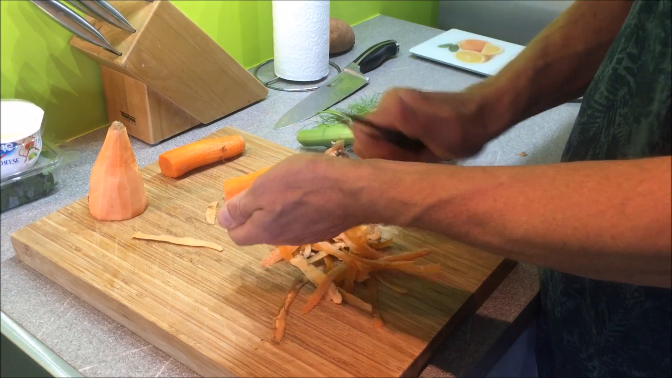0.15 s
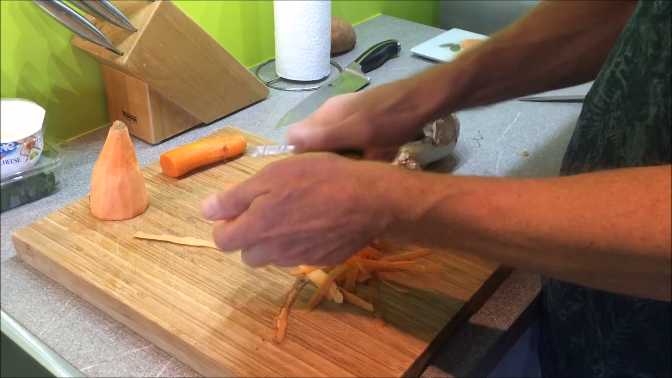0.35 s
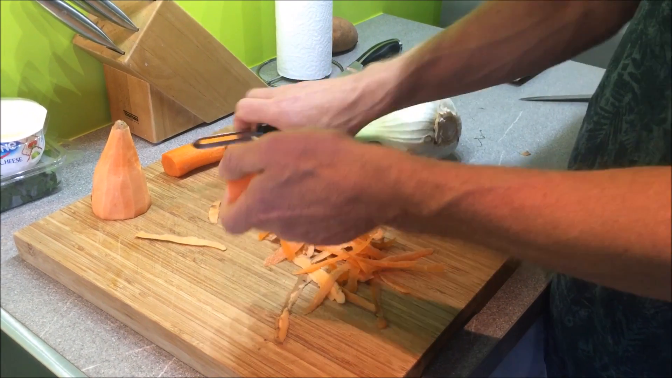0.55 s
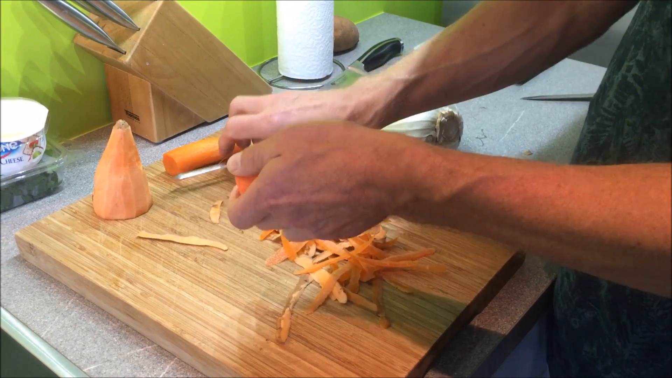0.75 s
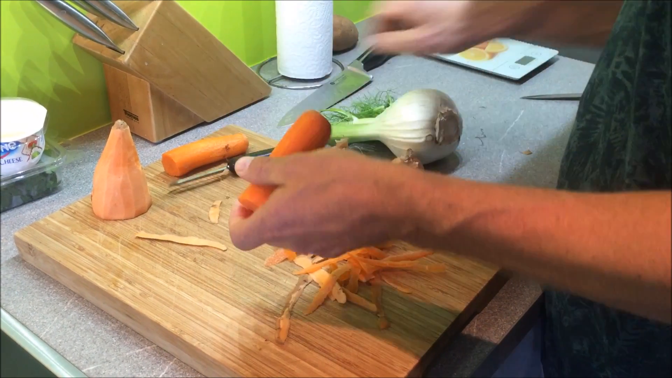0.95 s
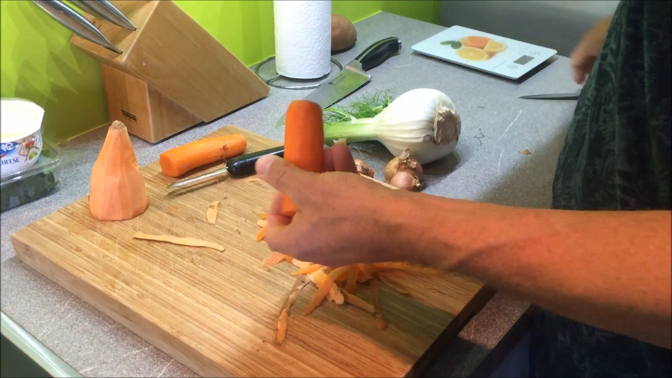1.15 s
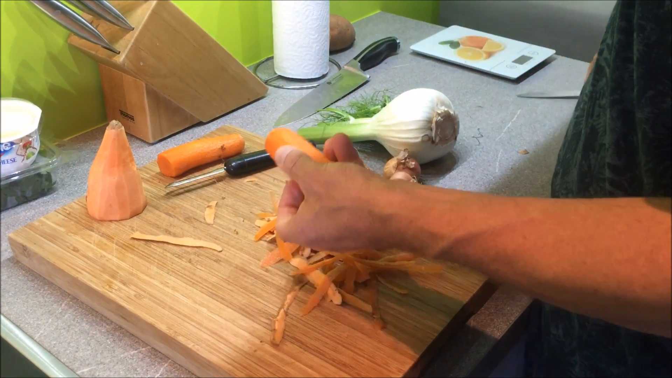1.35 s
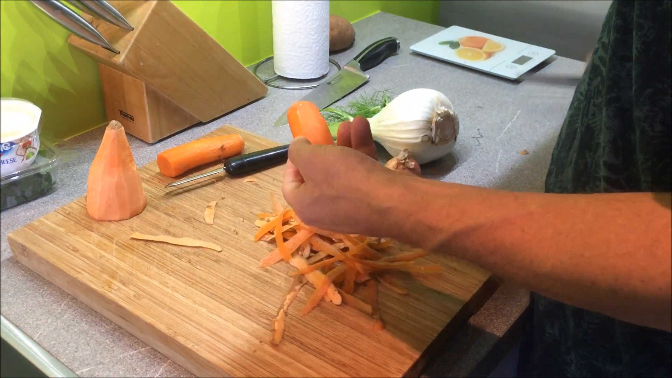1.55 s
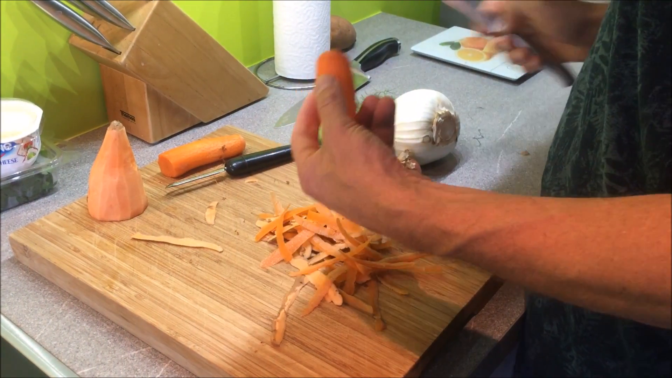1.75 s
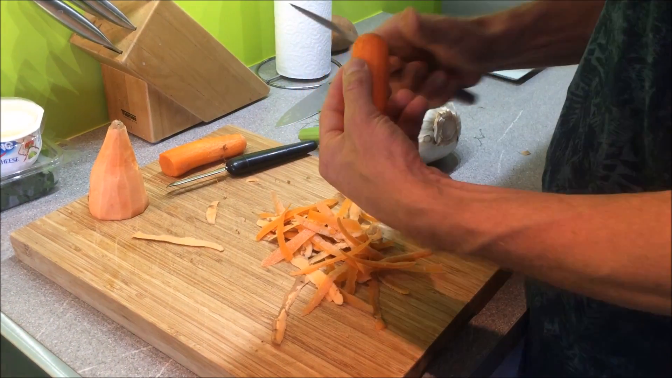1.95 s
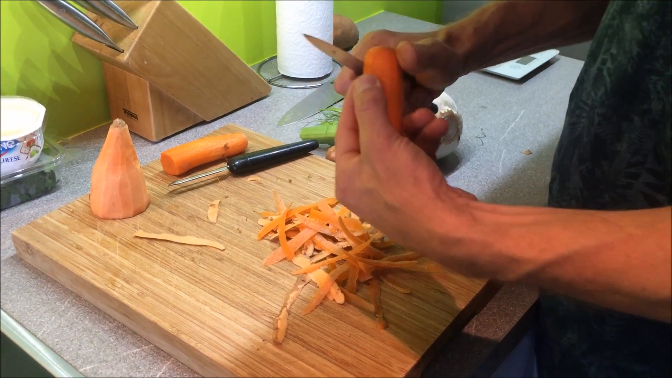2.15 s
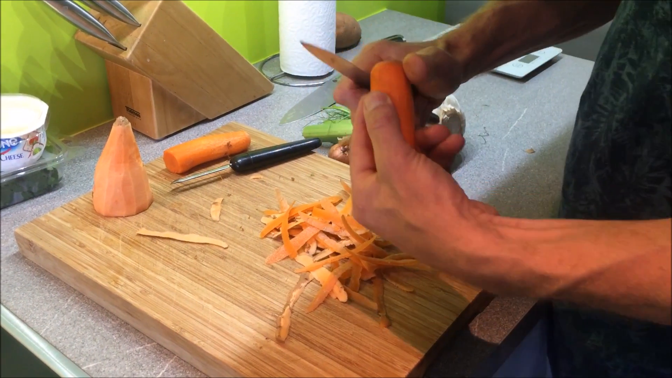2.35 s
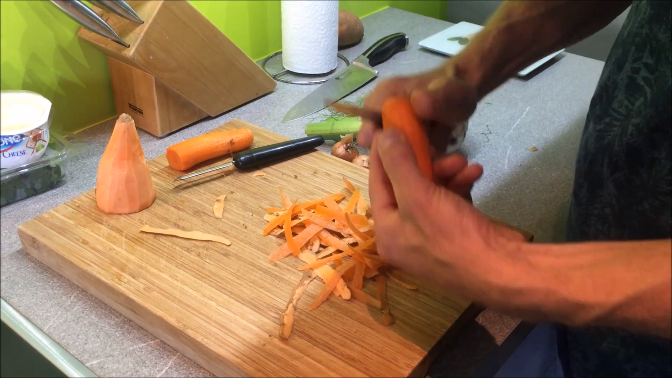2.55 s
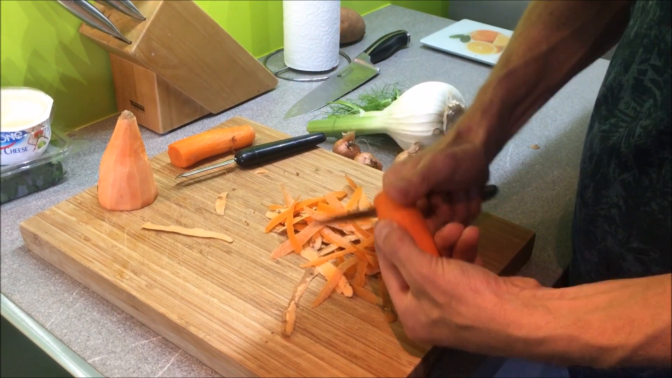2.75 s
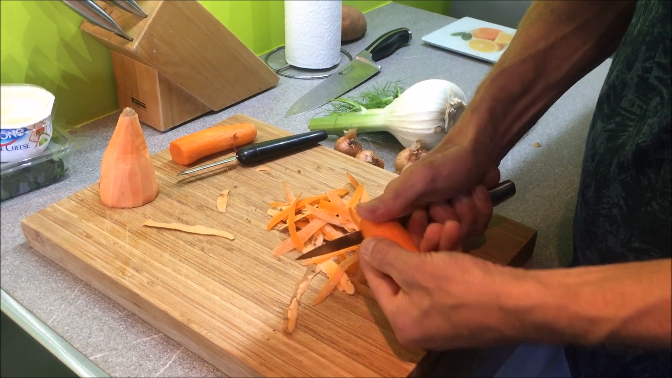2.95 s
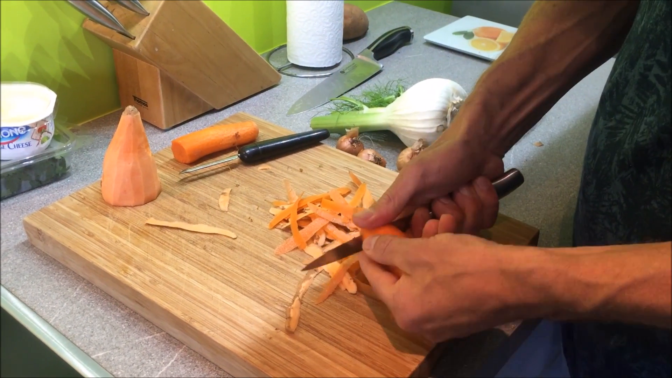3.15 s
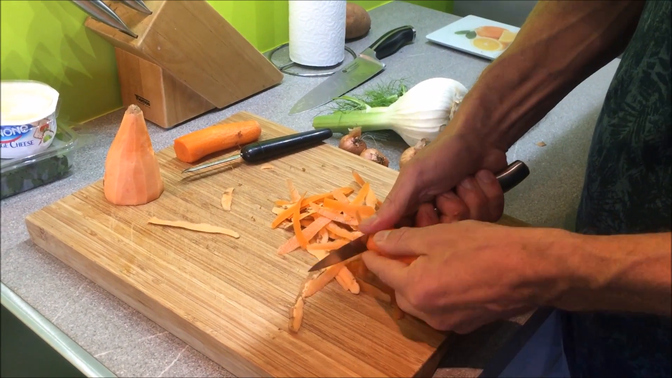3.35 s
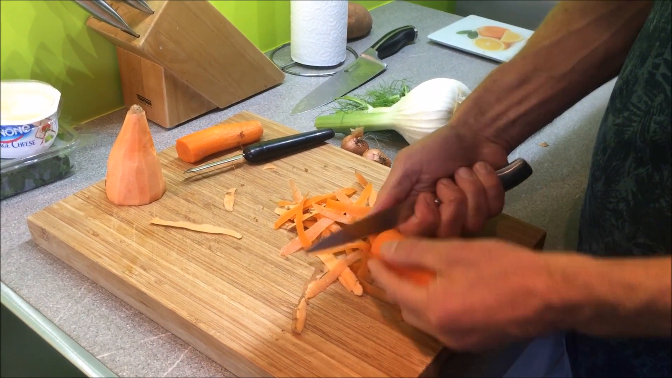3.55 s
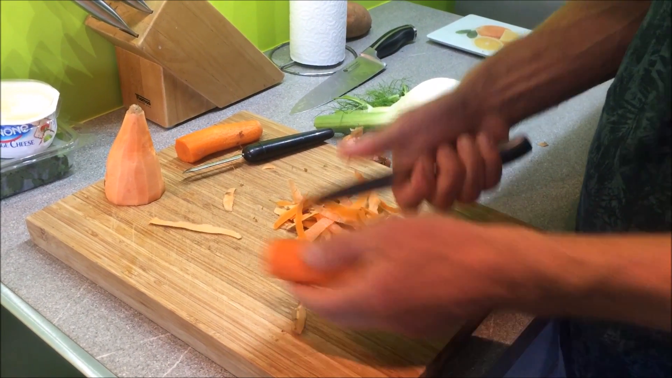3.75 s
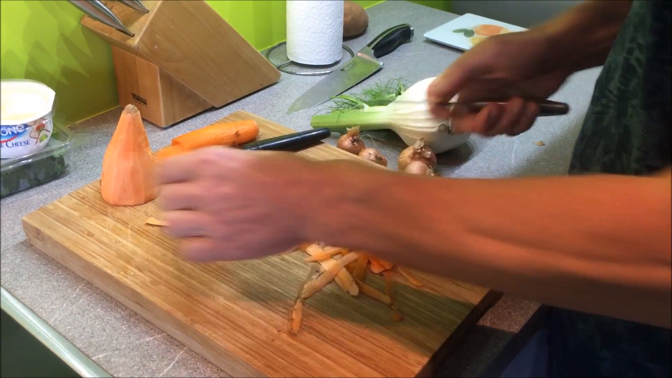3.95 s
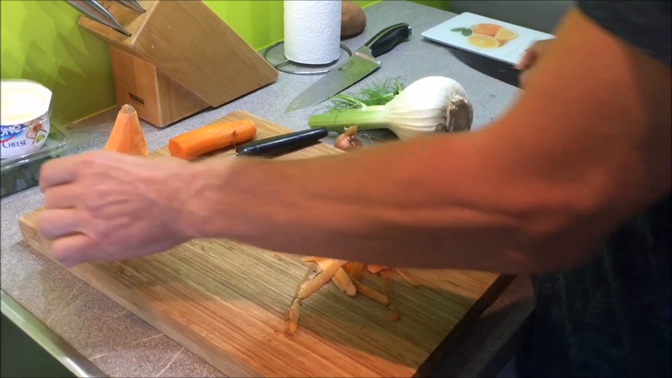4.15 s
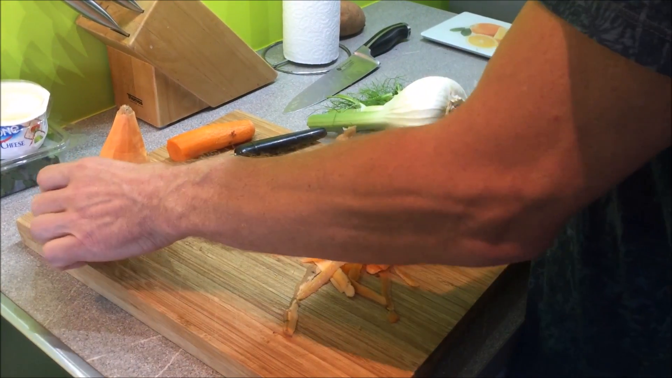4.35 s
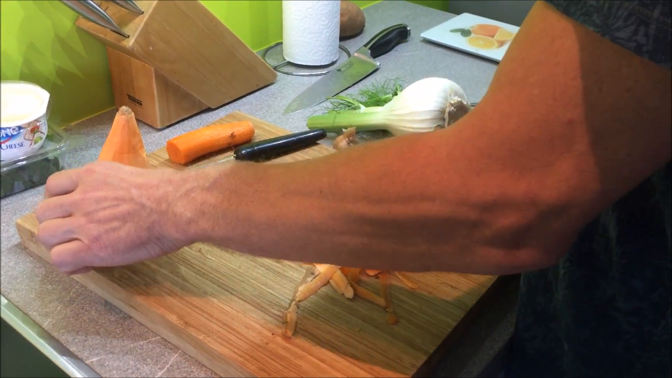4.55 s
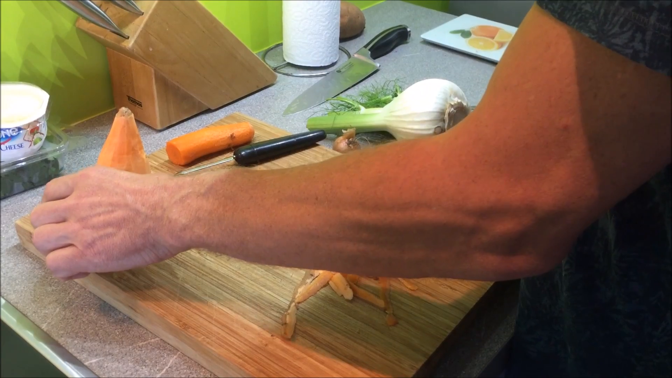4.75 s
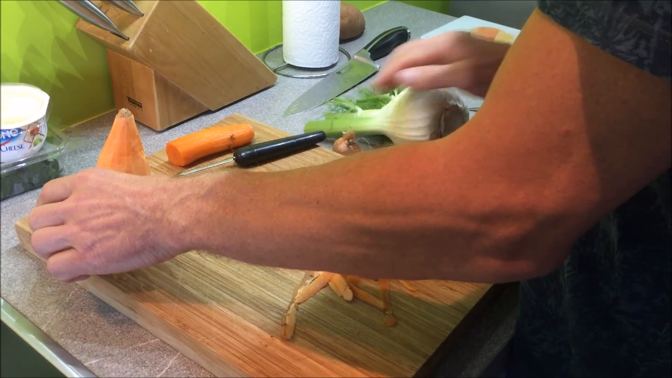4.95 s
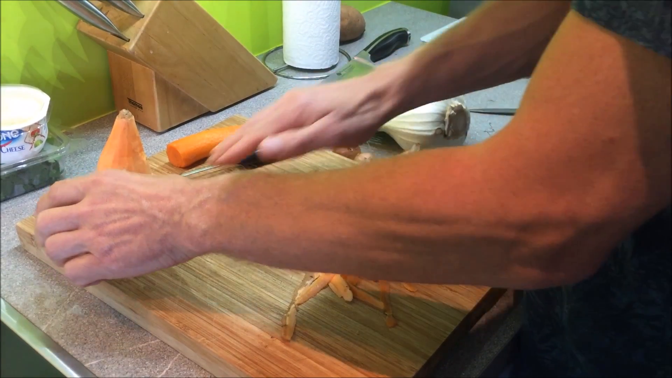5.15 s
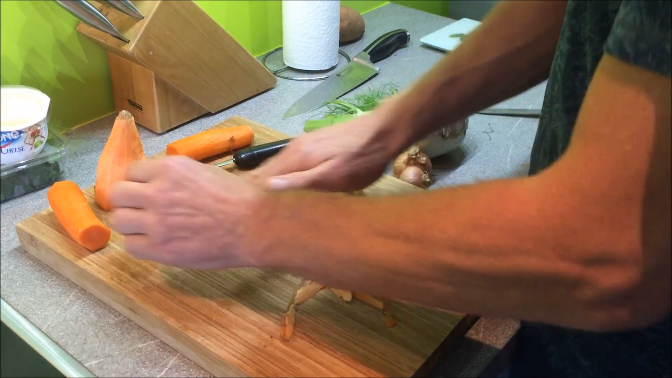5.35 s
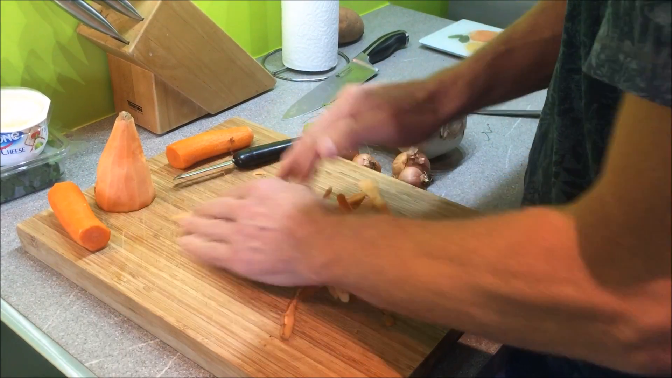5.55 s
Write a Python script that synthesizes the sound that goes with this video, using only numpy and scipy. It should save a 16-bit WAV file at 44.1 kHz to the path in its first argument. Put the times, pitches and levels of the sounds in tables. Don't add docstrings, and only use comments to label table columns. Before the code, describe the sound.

Last carrot peel stroke, tool dropped with a bright clatter, steel drawn, crisp cutting snaps, a hard knife slam and soft board taps over fridge hum.

```python
import sys
import numpy as np
from scipy import signal
from scipy.fft import rfft, irfft
from scipy.io import wavfile
from scipy.ndimage import uniform_filter1d, map_coordinates

SR = 44100
rng = np.random.default_rng(int(sys.argv[2]) if len(sys.argv) > 2 else 0)


def store_pcm(level_fs):
    pcm = np.round(np.clip(level_fs, -1, 1) * 32767).astype(np.int16)
    wavfile.write(sys.argv[1], SR, np.atleast_2d(pcm).T)


def invert_db(x):
    u = np.asarray(x, float) / 20
    return 10 ** u


N = 250914
SPAN = int(0.4 * SR)


def unit(x):
    return x / np.sqrt(np.mean(x ** 2) + 1e-20)


def along(points, hz):
    f, v = np.transpose(points)
    return np.interp(np.log(hz + 1), np.log(f + 1), v)


def wobble(rate, count=N, order=3):
    knots = rng.standard_normal(int(count * rate / SR) + 4)
    return map_coordinates(knots, [np.arange(count) * rate / SR], order=order)


def coloured(x, db_of):
    size = 2048
    gain = invert_db(db_of(np.fft.rfftfreq(size, 1 / SR)))
    cepstrum = irfft(np.log(gain + 1e-6), size)
    cepstrum[1:size // 2] *= 2
    cepstrum[size // 2 + 1:] = 0
    return signal.fftconvolve(x, irfft(np.exp(rfft(cepstrum)), size))[:len(x)]


# (frequency [Hz], t60 [s])
ROOM_DECAY = [(150, 0.638), (1500, 0.49), (6000, 0.41), (15000, 0.15)]


def echoes(count):
    hz, t, z = signal.stft(rng.standard_normal(count + 256), SR, nperseg=256)
    z = z * invert_db(-60 * t / along(ROOM_DECAY, hz)[:, None])
    tail = signal.istft(z, SR, nperseg=256)[1][:count]
    tail = tail * (1 - np.exp(-np.arange(count) / SR / 0.00053))
    return tail / np.linalg.norm(tail)


def bell(modes, drift, push):
    t = np.arange(SPAN) / SR
    hz, level, t60 = np.transpose(modes)[..., None]
    slip = drift * np.array([wobble(100, count=SPAN, order=1) for _ in modes])
    strength = invert_db(level + rng.normal(0, 1.8, level.shape)) / push(hz)
    decay = invert_db(-60 * t / np.clip(t60, 0.005, 0.8))
    onset = (1 - np.exp(-hz * t)) ** 2
    return np.sum(strength * decay * onset * np.sin(2 * np.pi * hz * t + slip), axis=0)


def struck(events, tone, modes, rise, ring_db, grit_db, room_db, drift):
    t = np.arange(SPAN) / SR
    fade = np.cos(np.pi / 2 * np.arange(SPAN) / SPAN)
    out = np.zeros(N + SR)
    tails = [echoes(SPAN) for _ in range(3)]
    for k, (s, db, fall, *tilt_db) in enumerate(events):
        attack = max(rise * fall, 1e-4)
        decay = invert_db(-60 * np.clip(t - attack, 0, 1) / max(fall, 1e-3))
        shape = np.clip(t / attack, 0, 1) * decay
        grit = invert_db(grit_db * wobble(900, count=SPAN, order=1))
        burst = shape * grit * rng.standard_normal(SPAN)
        direct = coloured(burst, lambda f: along(tone, f) + sum(tilt_db) * np.log2((f + 100) / 4000))
        held = uniform_filter1d(np.abs(rfft(burst)), size=9)
        body = bell(modes, drift, lambda hz: held[(hz * SPAN / SR).astype(int)])
        ring = signal.fftconvolve(burst, body)[:SPAN]
        sound = direct / np.abs(direct).max() + invert_db(ring_db) * ring / np.abs(ring).max()
        sound = sound + invert_db(room_db) * signal.fftconvolve(sound, tails[k % len(tails)])[:SPAN]
        out[round(s * SR):][:SPAN] += invert_db(db) * sound * fade
    return out[:N]


def rub(swells, tone, modes, ring_db, grit_db, room_db):
    first = max(round(swells[0][0] * SR) - SPAN, 0)
    t = np.arange(first, round(swells[-1][0] * SR) + 2 * SPAN) / SR
    grit = invert_db(grit_db * wobble(600, count=len(t)) + 1.7 * wobble(60, count=len(t)))
    grains = grit * rng.standard_normal(len(t))
    direct = unit(coloured(grains, lambda f: along(tone, f)))
    body = bell(modes, drift=1.0, push=np.ones_like)
    ring = unit(signal.fftconvolve(grains, body)[:len(t)])
    level = 0
    for s, db, rise, fall in swells:
        level = level + invert_db(db - 20 * np.where(t < s, (s - t) / rise, (t - s) / fall))
    x = level * unit(direct + invert_db(ring_db) * ring)
    x = x + invert_db(room_db) * signal.fftconvolve(x, echoes(SPAN))[:len(t)]
    return np.pad(x, (first, N))[:N]


# (frequency [Hz], width [Hz], level [dB], unsteadiness [ratio])
FRIDGE_HUM = [
    (58.3, 15, -57, 0.39),
    (100.6, 5.4, -46.5, 0.095),
    (146.2, 14, -59, 0.35),
    (198, 7.6, -48.5, 0.41),
    (298.4, 7, -52, 0.25),
    (8440, 97, -86.5, 0.68),
]
# (frequency [Hz], level [dB per Hz])
AIR_TONE = [(15, -44), (25, -17.5), (95, -5), (150, -8), (296, -7.5), (483, -18.5), (538, -24),
            (651, -21.5), (878, -30.5), (1180, -29), (1550, -31), (1880, -29.5), (2670, -43), (14000, -55),
            (16500, -67)]


def fridge():
    t = np.arange(N) / SR
    lines = 0
    for hz, width, db, depth in FRIDGE_HUM:
        sway = 1 + depth * (wobble(width) + 1j * wobble(width))
        lines = lines + invert_db(db) * np.real(sway * np.exp(2j * np.pi * hz * t))
    z = signal.stft(rng.standard_normal(N), nperseg=512)[2]
    patches = uniform_filter1d(rng.standard_normal(z.shape), size=3, axis=0)
    patches = uniform_filter1d(patches, size=12, axis=1)
    mottled = signal.istft(z * invert_db(1.5 * unit(patches)), nperseg=512)[1][:N]
    air = unit(coloured(mottled, lambda f: along(AIR_TONE, f)))
    return lines + invert_db(-46 + 0.4 * wobble(2.636) + 1.1 * wobble(7)) * air



# (time [s], level [dB], rise [s], fall [s])
BRUSH_SWELLS = [
    (2.628, -60, 0.13, 0.13),
    (3.05, -57, 0.049, 0.18),
    (3.19, -61.5, .1, .15),
    (3.31, -63, .1, .1),
    (5.528, -56, 0.11, 0.093),
    (5.638, -64.5, 0.031, 0.044),
    (5.688, -54, 0.065, .04),
]
# (frequency [Hz], level [dB per Hz])
BRUSH_TONE = [(1470, -20), (2500, -18), (3830, -3), (4310, -9), (7190, -11), (13200, -10), (16000, -8)]
# (frequency [Hz], level [dB], t60 [s])
BLADE_MODES = [(3600, -3.5, 0.06), (4534, 8.5, 0.035), (4800, -11, 0.028), (5303, -10.5, 0.013),
               (6490, -14.5, 0.032), (7190, -13, 0.025), (9450, -13, 0.018), (11390, -19, 0.019)]
# (time [s], level [dB], t60 [s], tilt [dB per octave])
THUD_BLOWS = [
    (.913, -32.5, 0.021, -1),
    (1.657, -30, 0.039, 2),
    (1.375, -51, 0.092, -8),
    (1.53, -34, 0.12, 1.5),
    (4.13, -44, 0.017, -4),
    (4.41, -33, .05, -3.5),
    (4.592, -42, 0.038, -1),
    (4.775, -18.5, 0.057, -1),
]
# (frequency [Hz], level [dB per Hz])
BOARD_TONE = [(30, -26.5), (70, -3.5), (200, 1.5), (500, -6.5), (900, -24.5), (2000, -59.5)]
# (frequency [Hz], level [dB], t60 [s])
BOARD_MODES = [(64.4, 5.5, 0.2), (150.5, -12, .12), (269.8, -18, 0.08), (351, -21, 0.08)]
# (time [s], level [dB], t60 [s])
TAP_BLOWS = [
    (5.155, -50.5, 0.041),
    (5.30, -50, 0.077),
    (5.325, -60, 0.06),
    (5.46, -51.5, 0.076),
    (5.53, -55, 0.063),
    (5.64, -61, 0.023),
    (2.61, -48.5, 0.069),
]
# (frequency [Hz], level [dB per Hz])
HANDLE_TONE = [(200, -27.5), (520, -8), (800, -12), (1200, -5), (2100, 0), (2800, -12.5), (5000, -33)]
# (frequency [Hz], level [dB], t60 [s])
TAP_MODES = [(644, 0, 0.063), (1168, 2.5, 0.066), (1720, -11, 0.17), (2020, -27, 0.11), (2360, -16.5, 0.21),
             (3303, -15, 0.043), (4050, -21, 0.079)]
# (time [s], level [dB], t60 [s], tilt [dB per octave])
PALM_BLOWS = [
    (4.395, -34.5, .04, 3),
    (4.412, -37, 0.034, -3),
    (4.441, -33, 0.038, 1),
    (4.461, -35, 0.054, -10),
    (4.487, -38, 0.042, -6.5),
]
# (frequency [Hz], level [dB per Hz])
PALM_TONE = [(90, -17.5), (220, 1), (450, -1.5), (720, -7.5), (1000, -29), (1600, -36), (4000, -86)]
# (frequency [Hz], level [dB], t60 [s])
PALM_MODES = [(256, 2, .06), (315, -3, 0.066), (618, 0.5, 0.049), (706, -11, 0.035)]
# (time [s], level [dB], t60 [s])
ROCK_BLOWS = [
    (.914, -39.5, .02),
    (4.783, -38.5, 0.055),
    (5.053, -29.5, 0.016),
    (5.17, -38, 0.035),
    (5.22, -45, 0.019),
]
# (frequency [Hz], level [dB per Hz])
ROCK_TONE = [(30, -30), (65, 0), (200, -6), (450, -20), (900, -45), (2000, -100)]


def hands():
    brushing = rub(BRUSH_SWELLS, BRUSH_TONE, BLADE_MODES, ring_db=-7, grit_db=-0.5, room_db=-7.5)
    thuds = struck(THUD_BLOWS, BOARD_TONE, BOARD_MODES,
                   rise=0.0599, ring_db=-18.5, grit_db=-2.0, room_db=0.5, drift=0.3)
    taps = struck(TAP_BLOWS, HANDLE_TONE, TAP_MODES,
                  rise=0.24, ring_db=3.5, grit_db=1.5, room_db=-7.5, drift=0.18)
    palm = struck(PALM_BLOWS, PALM_TONE, PALM_MODES,
                  rise=0.043, ring_db=-5.0, grit_db=1.0, room_db=-6.5, drift=0.92)
    rocking = struck(ROCK_BLOWS, ROCK_TONE, BOARD_MODES,
                     rise=0.21, ring_db=0.5, grit_db=5.5, room_db=-5.0, drift=0.43)
    return brushing + thuds + taps + palm + rocking


# (time [s], level [dB], rise [s], fall [s])
STROKE_SWELLS = [
    (.03, -44.5, .2, .1),
    (.108, -38, 0.11, 0.058),
]
# (frequency [Hz], level [dB per Hz])
STROKE_TONE = [(290, -55), (500, -18), (562, -17), (795, -4), (1320, -17), (2260, -1.5), (3060, -13),
               (3440, 2), (4400, -9.5), (12700, -15), (16000, -18)]
# (frequency [Hz], level [dB], t60 [s])
STROKE_MODES = [(2230, -12, 0.05), (2380, 3, 0.055), (3410, 3, 0.069), (3590, -2, 0.067), (3720, -5, 0.062),
                (3910, -2, .07), (5370, -2, .08), (5700, -7, 0.056), (6950, -10, .06)]
# (time [s], level [dB], t60 [s])
SNIP_BLOWS = [
    (.09, -32.5, 0.11),
    (.2105, -25, 0.016),
]
# (frequency [Hz], level [dB per Hz])
BLADE_TONE = [(1200, -41), (2200, -22.5), (3500, -3), (4400, -2), (6600, -4.5), (10000, -11.5),
              (16000, -26)]
# (time [s], level [dB], t60 [s], tilt [dB per octave])
TICK_BLOWS = [(.44, -56, 0.08, -12), (.461, -43.5, 0.027, -7), (.50, -48.5, 0.024, -5),
              (.514, -51, 0.073, -8), (.542, -44, 0.056, -11.5), (.5626, -29.5, 0.015, -5.5),
              (.7332, -42, 0.015, -19.5), (.8155, -44, 0.033, -4.5), (1.98, -57.5, 0.14, 1),
              (2.176, -49.5, 0.017, -10), (2.19, -54, 0.038, 9), (2.255, -62, .066, 1.5),
              (2.3945, -54.5, 0.021, 17.5), (2.405, -68.5, .028, 0), (3.589, -57, 0.016, -3.5)]
# (time [s], level [dB], rise [s], fall [s])
RATTLE_SWELLS = [
    (1.0, -48, .06, .12),
    (1.1, -54, .08, .1),
    (1.18, -54, .05, .05),
]
# (frequency [Hz], level [dB per Hz])
PEELER_TONE = [(200, -40), (540, -13), (900, -19.5), (2100, -3), (3200, -11), (5000, -13.5), (7400, -9),
               (12700, -15), (16000, -23)]
# (frequency [Hz], level [dB], t60 [s])
PEELER_MODES = [(550, -5, 0.049), (2005, -7.5, 0.053), (2435, -5, 0.03), (3470, -18.5, 0.047),
                (4460, -6, 0.035), (5700, -8, 0.035), (7300, -3, 0.048), (7340, -3, 0.04),
                (8750, -14, 0.0401), (10900, -11, 0.028), (11270, -13.5, 0.02), (12500, -11.5, 0.029),
                (13100, -13, 0.03), (15130, -13, 0.028)]
# (time [s], level [dB], t60 [s])
GRIP_BLOWS = [
    (.8904, -50.5, 0.059),
    (.9098, -12.5, 0.016),
    (.9215, -15, 0.018),
    (.93, -33, 0.088),
    (.968, -25.5, 0.063),
    (1.043, -37, 0.072),
    (1.075, -38, 0.022),
]
# (frequency [Hz], level [dB], t60 [s])
GRIP_MODES = [(532, -3, 0.0398), (944, -17.5, .05), (1208, -0.5, 0.04), (1462, -6, 0.036), (1723, -7, .06),
              (2083, -0.5, 0.045), (2400, -4.5, 0.075), (2510, -9, 0.042), (3300, -13.5, 0.057)]
# (time [s], level [dB], t60 [s], tilt [dB per octave])
SETTLE_BLOWS = [
    (.972, -32, .012, 4),
    (1.0421, -42, .02),
    (1.058, -41, .02),
    (1.0705, -40, .02),
    (1.1339, -42, .015),
    (1.1453, -39, .012, -6),
    (1.1718, -43, .02),
    (1.1922, -38, .02, -6),
    (1.212, -52, .03),
    (1.2441, -47, .02),
]
# (frequency [Hz], level [dB], t60 [s])
SETTLE_MODES = [(2035, 0.5, 0.049), (2470, -5, .04), (4430, -16, 0.054), (4620, -8, .05),
                (7220, -23, 0.035)]
# (time [s], level [dB], t60 [s], tilt [dB per octave])
CLATTER_BLOWS = [(.9108, -9, 0.03, 3), (.9122, -5, .03, 4), (.9148, -6, .025, 4), (.922, -12, 0.03, -1),
                 (.932, -22, .12, 3), (.952, -25, .09, 5), (.9717, -18, 0.035, 1), (.977, -27, .06, 4),
                 (.989, -25, 0.04, 2), (1.041, -29, .035, 1), (1.049, -30, 0.045, 0),
                 (1.0704, -28, 0.035, 3), (1.0894, -27, 0.045, 4), (1.1333, -30, 0.05, 0),
                 (1.153, -37, .03, 0), (1.1717, -31, 0.05, 2), (1.192, -44, .04, 0), (1.2435, -49, .03, -2)]


def peeler():
    stroke = rub(STROKE_SWELLS, STROKE_TONE, STROKE_MODES, ring_db=-6, grit_db=1.5, room_db=-12.0)
    snip = struck(SNIP_BLOWS, BLADE_TONE, BLADE_MODES,
                  rise=0.078, ring_db=-21, grit_db=4.5, room_db=-14.0, drift=0.63)
    ticks = struck(TICK_BLOWS, BLADE_TONE, BLADE_MODES,
                   rise=0.086, ring_db=-4.5, grit_db=3.5, room_db=-11.0, drift=1.0)
    rattle = rub(RATTLE_SWELLS, PEELER_TONE, PEELER_MODES, ring_db=-9.0, grit_db=3.0, room_db=-6.5)
    grip = struck(GRIP_BLOWS, HANDLE_TONE, GRIP_MODES,
                  rise=0.0835, ring_db=-1.5, grit_db=3, room_db=-10.5, drift=0.89)
    settle = struck(SETTLE_BLOWS, HANDLE_TONE, SETTLE_MODES,
                    rise=0.043, ring_db=5, grit_db=2, room_db=-11, drift=0.43)
    clatter = struck(CLATTER_BLOWS, PEELER_TONE, PEELER_MODES,
                     rise=0.034, ring_db=-4.5, grit_db=6.0, room_db=-11.0, drift=1.72)
    return stroke + snip + ticks + rattle + grip + settle + clatter


# (time [s], level [dB], rise [s], fall [s])
DRAW_SWELLS = [
    (1.383, -30.5, 0.029, 0.066),
    (1.49, -55, 0.075, 0.087),
]
# (frequency [Hz], level [dB per Hz])
KNIFE_TONE = [(350, -37), (600, -23), (1200, 5.5), (2500, -3), (4000, -8.5), (7000, -4), (10000, -11),
              (16000, -18)]
# (frequency [Hz], level [dB], t60 [s])
DRAW_MODES = [(477, 1.5, 0.11), (1090, -3, 0.2), (1402, 4, 0.12), (2320, -9, 0.067), (3820, 4.5, 0.066),
              (4590, -5, 0.06), (5200, -3, 0.06), (6490, -1.5, 0.15), (6740, -9, 0.071), (8350, -10, 0.08),
              (2570, -3, .06), (9360, -3.5, 0.052), (12500, -4, 0.08), (14900, -5, 0.044)]
# (time [s], level [dB], rise [s], fall [s])
LIFT_SWELLS = [
    (1.532, -34, 0.03, 0.073),
    (1.597, -43, 0.022, 0.041),
]
# (frequency [Hz], level [dB], t60 [s])
LIFT_MODES = [(478, -2, 0.055), (1102, -4.5, 0.15), (1800, 2, 0.092), (2200, -5.5, .04), (4410, -11, 0.1),
              (4560, -13, 0.054), (6430, -9.5, .1), (7000, -8, 0.061), (8053, -15, .1), (9400, -5, .07),
              (11900, -10, .07), (12400, -19, .07), (13510, -15, .07), (14900, -16, .05)]
# (time [s], level [dB], t60 [s], tilt [dB per octave])
TOUCH_BLOWS = [
    (4.532, -50, 0.28),
    (4.5865, -19, 0.045),
    (4.592, -16, 0.058),
    (4.598, -22.5, 0.068),
    (5, -36, 0.3, 0.5),
]
# (frequency [Hz], level [dB per Hz])
TOUCH_TONE = [(250, -13), (450, 3.5), (800, -15), (1300, -5.5), (2300, -6), (4500, -5), (6600, -0.5),
              (16000, -17)]
# (frequency [Hz], level [dB], t60 [s])
TOUCH_MODES = [(432, -7.5, 0.042), (1430, -15, 0.03), (2270, -8, 0.07), (4700, 1.5, 0.044),
               (5640, -6, 0.071), (6800, -2.5, 0.19), (7700, -8, .15), (9000, -17.5, .06),
               (12700, -8.5, 0.26)]
# (time [s], level [dB], t60 [s], tilt [dB per octave])
LAND_BLOWS = [
    (4.7725, -8.5, 0.053),
    (4.81, -26.5, 0.3, -2),
]
# (frequency [Hz], level [dB per Hz])
CRISP_TONE = [(500, -50), (1000, -26), (1500, -12), (2200, -2), (3200, -6), (5500, -4), (7000, -7),
              (10500, -4), (14500, -2), (16000, -5)]
# (frequency [Hz], level [dB], t60 [s])
LAND_MODES = [(4400, -6, .03), (4816, 0, .12), (6410, -9, .6), (6778, -8, .12), (9685, -16, .1),
              (11640, -12, .04), (12400, -14, .04), (15000, -14, .06)]
# (time [s], level [dB], t60 [s])
DROP_BLOWS = [
    (4.865, -15, 0.04),
    (4.871, -14, 0.045),
    (4.885, -24, 0.05),
    (4.896, -20, 0.05),
    (4.915, -29, 0.09),
    (4.935, -42, 0.15),
]
# (frequency [Hz], level [dB per Hz])
DROP_TONE = [(1500, -37), (3000, -7.5), (4600, -13), (6500, -10), (8500, -5), (11200, -11), (14500, 7),
             (16000, -5)]
# (frequency [Hz], level [dB], t60 [s])
DROP_MODES = [(4270, -22.5, 0.46), (4470, -16, 0.29), (4780, -7, .05), (6460, -9, 0.38), (6718, -10, 0.15),
              (7030, -9, 0.13), (8045, -4, 0.17), (9060, -13.5, 0.38), (9690, -6, .17), (11220, -11, 0.14),
              (11500, -2.5, 0.11), (12270, -17, .1), (13510, -12, 0.2), (13860, -7.5, .1)]
# (time [s], level [dB], t60 [s])
KNOCK_BLOWS = [
    (1.6555, -11.5, 0.042),
    (1.675, -23, 0.073),
    (1.70, -35.5, 0.097),
    (2.494, -41.5, 0.033),
]
# (frequency [Hz], level [dB per Hz])
COUNTER_TONE = [(120, -23), (300, -5.5), (800, -2), (1250, 3.5), (1800, -6), (2600, -5), (3500, -16),
                (6500, -24.5), (14000, -43)]
# (frequency [Hz], level [dB], t60 [s])
COUNTER_MODES = [(754, -18, 0.019), (1204, -10, 0.05), (1470, -11, 0.061), (1530, -14, 0.12),
                 (1762, 3, 0.15), (2016, 5, 0.027), (2430, -28, 0.064)]
# (time [s], level [dB], t60 [s])
SLAM_BLOWS = [
    (4.7735, -2, 0.015),
    (4.787, -10.5, 0.018),
    (4.799, -15.5, 0.032),
    (4.81, -37, 0.027),
    (4.83, -27, 0.05),
    (4.844, -28, 0.027),
    (4.853, -14, 0.028),
    (4.9, -38, 0.039),
]
# (frequency [Hz], level [dB per Hz])
SLAM_TONE = [(120, -17.5), (180, -10.5), (500, -16), (900, -19.5), (1250, -2.5), (1900, -5.5), (2500, -30),
             (8800, -78)]
# (frequency [Hz], level [dB], t60 [s])
SLAM_MODES = [(588, -8, 0.045), (760, -11.5, 0.072), (1100, -8, 0.03), (1213, 3, 0.053),
              (1374, -2.5, 0.039), (1480, -7, 0.04), (1566, -2.5, 0.039), (1773, -3, 0.03),
              (1957, -12, 0.048), (2205, -17.5, .04)]
# (time [s], level [dB], t60 [s], tilt [dB per octave])
CLINK_BLOWS = [
    (1.48, -33, -0.04, -1),
    (1.386, -31, 0.064),
    (1.5285, -41, .04),
    (1.595, -38.5, 0.07),
]


def knives():
    drawn = rub(DRAW_SWELLS, KNIFE_TONE, DRAW_MODES, ring_db=11, grit_db=4.5, room_db=-11.0)
    lifted = rub(LIFT_SWELLS, KNIFE_TONE, LIFT_MODES, ring_db=13.5, grit_db=3.5, room_db=-9.5)
    touched = struck(TOUCH_BLOWS, TOUCH_TONE, TOUCH_MODES,
                     rise=0.032, ring_db=-8.0, grit_db=3.5, room_db=-6, drift=0.85)
    landed = struck(LAND_BLOWS, CRISP_TONE, LAND_MODES,
                    rise=0.065, ring_db=-9.5, grit_db=3.5, room_db=-5.0, drift=1.0)
    dropped = struck(DROP_BLOWS, DROP_TONE, DROP_MODES,
                     rise=0.037, ring_db=-1.5, grit_db=2.0, room_db=-8.0, drift=0.51)
    knocked = struck(KNOCK_BLOWS, COUNTER_TONE, COUNTER_MODES,
                     rise=0.092, ring_db=-14.0, grit_db=-1, room_db=-11.0, drift=2.1)
    slammed = struck(SLAM_BLOWS, SLAM_TONE, SLAM_MODES,
                     rise=0.044, ring_db=-4.5, grit_db=2.5, room_db=-8, drift=1.0)
    caught = struck(CLINK_BLOWS, TOUCH_TONE, DRAW_MODES,
                    rise=0.05, ring_db=-15, grit_db=3, room_db=2.5, drift=1.2)
    return drawn + lifted + caught + touched + landed + dropped + knocked + slammed


# (frequency [Hz], centre time [s], half length [s], level [dB])
HIGH_TONES = [
    (5420, 2.867, 0.0099, -60),
    (8500, 2.862, .012, -61),
    (14100, 2.861, 0.013, -56),
]
# (time [s], level [dB], t60 [s], tilt [dB per octave])
CRACK_BLOWS = [(2.7871, -44, 0.014, 2.5), (2.8695, -44, 0.0054, 8), (2.8775, -45, .005, 4),
               (2.8825, -42, 0.006, 3), (2.8865, -47, .008, -3), (2.8938, -26, 0.0068, 0),
               (2.8972, -16, 0.0098, 7), (2.9, -14.5, 0.014, 7), (2.9018, -7, 0.011, 1.5),
               (2.9043, -26, 0.014, -4), (2.906, -26.5, .03, -0.5), (3.064, -39, 0.039, -3),
               (3.0705, -17, 0.024, -0.5), (3.119, -37, .013, 0), (3.1305, -19, 0.036, 1.5),
               (3.203, -30.5, 0.051, -1.5), (3.24, -38, .025, -1), (3.2864, -45, 0.0067, 0),
               (3.3455, -15.5, 0.03, -2.5), (3.353, -20.5, 0.079, 1), (3.555, -42.5, 0.095, -1),
               (5.0944, -49, 0.0045, 12), (5.1118, -35.5, 0.025, 2)]
# (frequency [Hz], level [dB], t60 [s])
FLESH_MODES = [(11900, -0.76, 0.009), (13800, -1.2, 0.022)]


def carrot():
    t = np.arange(N) / SR
    flicker = 0
    for hz, s, half, db in HIGH_TONES:
        flicker = flicker + invert_db(db) * np.exp(-((t - s) / half) ** 2) * np.sin(2 * np.pi * hz * t)
    cracks = struck(CRACK_BLOWS, CRISP_TONE, FLESH_MODES,
                    rise=0.099, ring_db=-20, grit_db=2.5, room_db=-12.0, drift=0.35)
    return flicker + cracks


def scene():
    return (fridge() + hands() + peeler() + knives() + carrot())[None]


THIN_TIMES = [.389, 0.689, 1.221, 1.691, 2.095, 2.5, 2.861, 4.803, 5.316, 5.486, 5.552, 5.658]


def thin_treble(x):
    hz, t, z = signal.stft(x, SR, nperseg=256, noverlap=192)
    dips = sum(1.63 * np.exp(-((t - s) / 0.0044) ** 2) for s in THIN_TIMES)
    depth = np.clip(dips, 0, 1)
    nearby = uniform_filter1d(np.abs(z), size=15, axis=0)
    weak = (hz[:, None] > 2500) & (np.abs(z) < 2.5 * nearby)
    return signal.istft(z * invert_db(-22 * depth * weak), SR, nperseg=256, noverlap=192)[1][:N]


# (frequency [Hz], gain [dB])
MICROPHONE_TONE = [(20, -28), (45, -3.5), (70, 0.5), (15750, -1), (16000, -16.5), (16600, -22.5),
                   (16900, -91.5)]


def low_pass(x):
    return signal.sosfilt(signal.butter(12, 16790, fs=SR, output="sos"), x)


def record(dry):
    hissing = dry[0] + invert_db(-80.0) * rng.standard_normal(N)
    clipped = hissing / (1 + np.abs(hissing / 0.97) ** 8) ** (1 / 8)
    trimmed = coloured(clipped, lambda f: along(MICROPHONE_TONE, f))
    return low_pass(thin_treble(trimmed)[None])


dry = scene()
out = record(dry)
store_pcm(out)
```